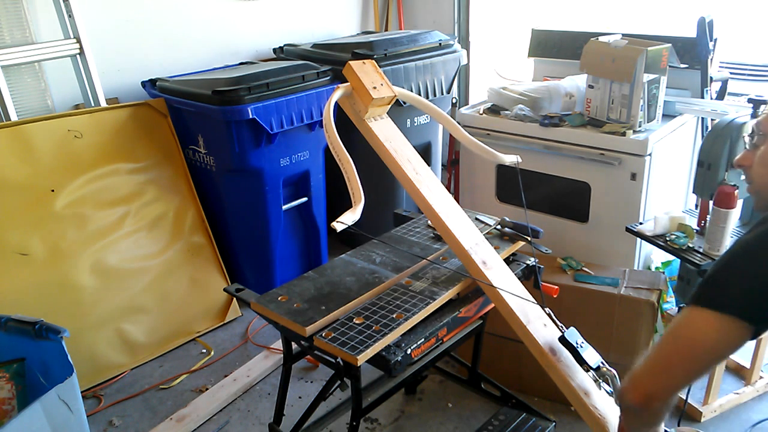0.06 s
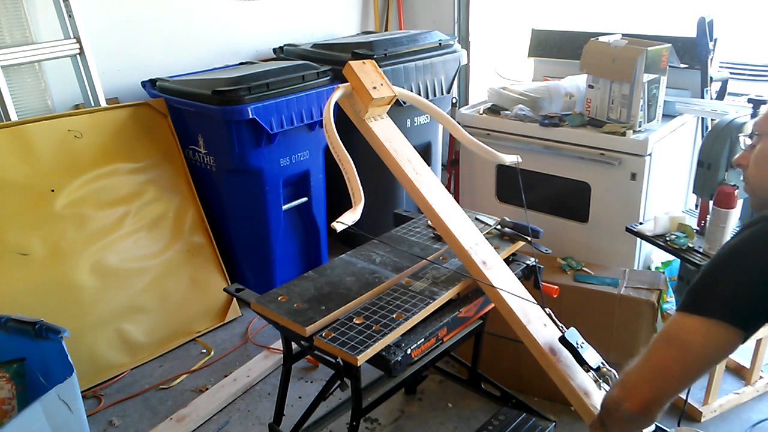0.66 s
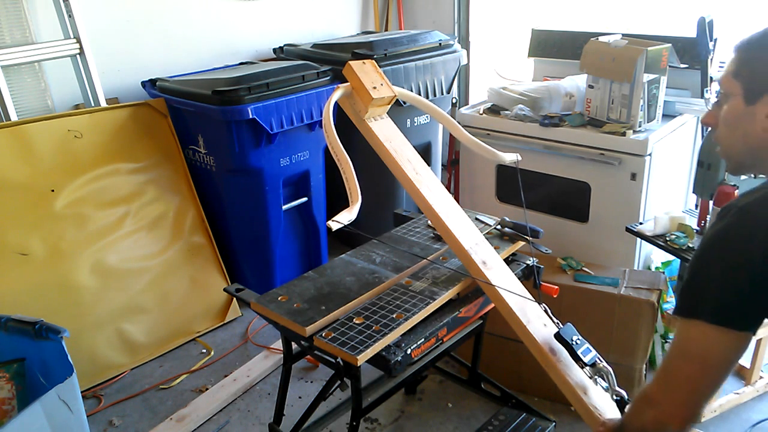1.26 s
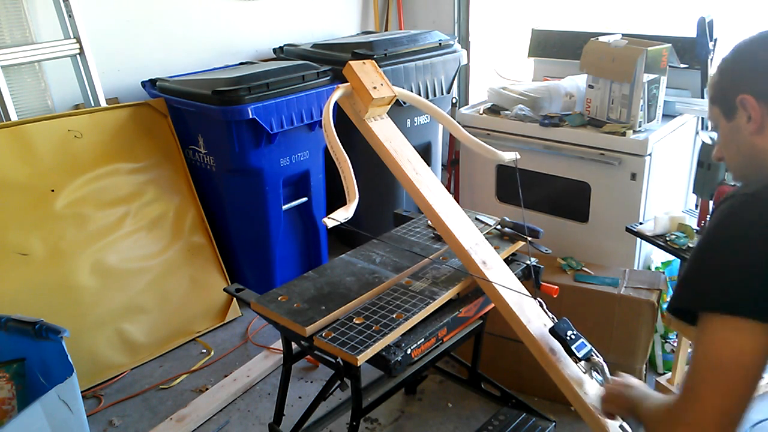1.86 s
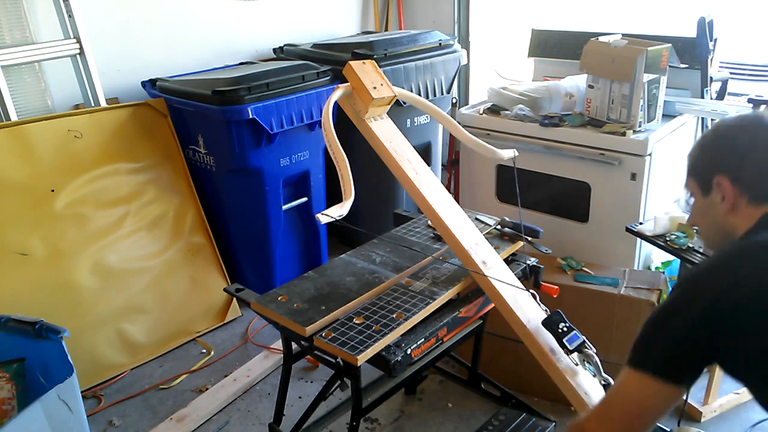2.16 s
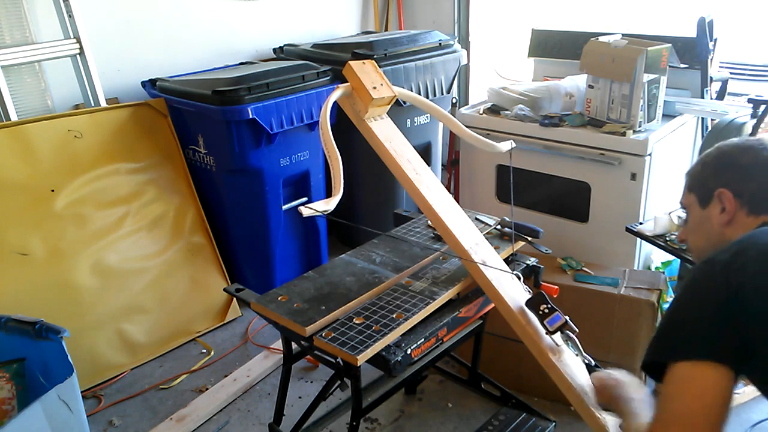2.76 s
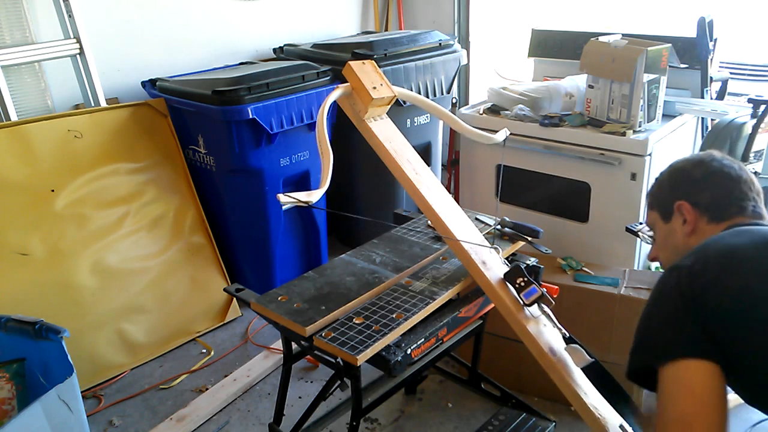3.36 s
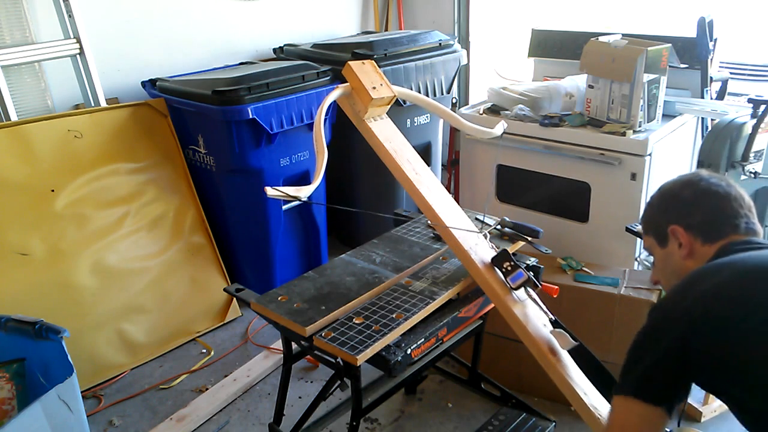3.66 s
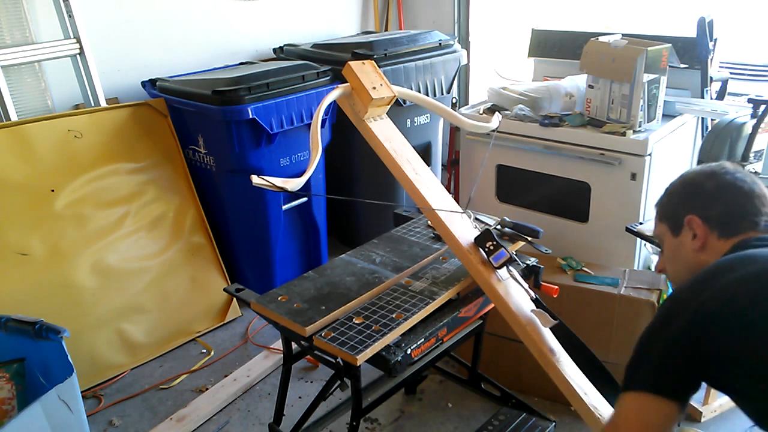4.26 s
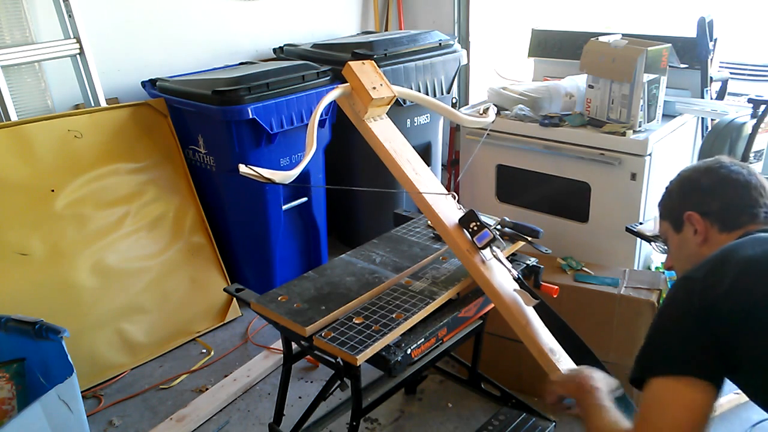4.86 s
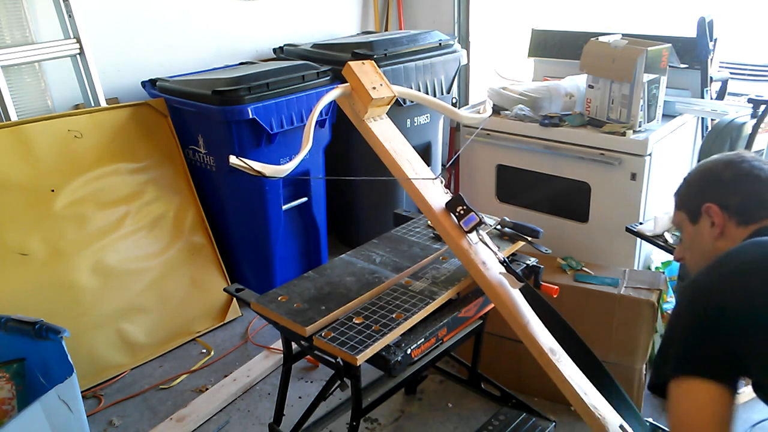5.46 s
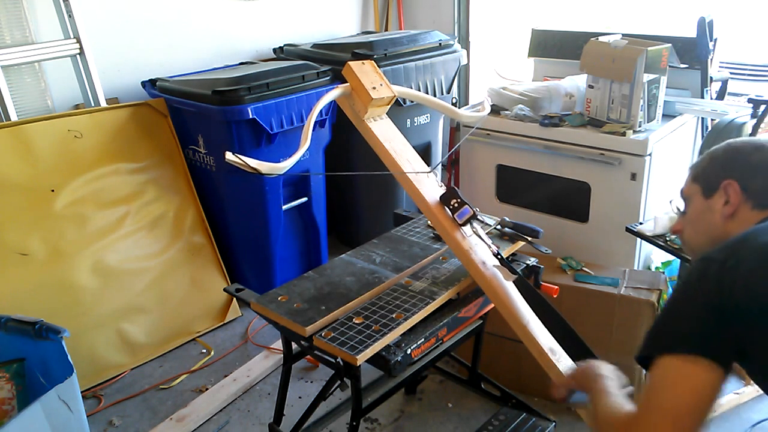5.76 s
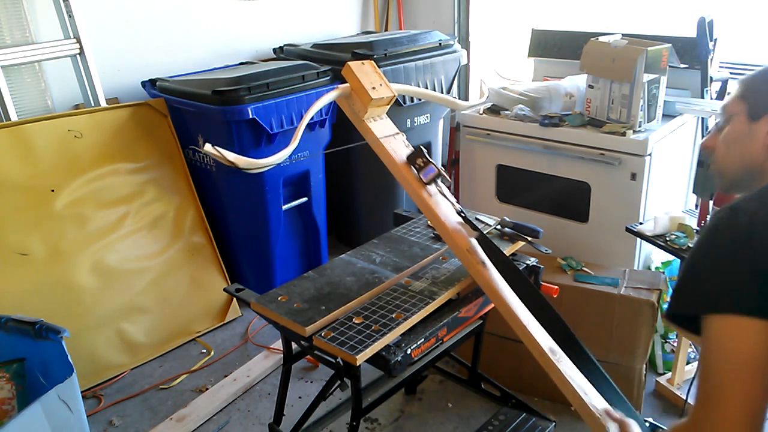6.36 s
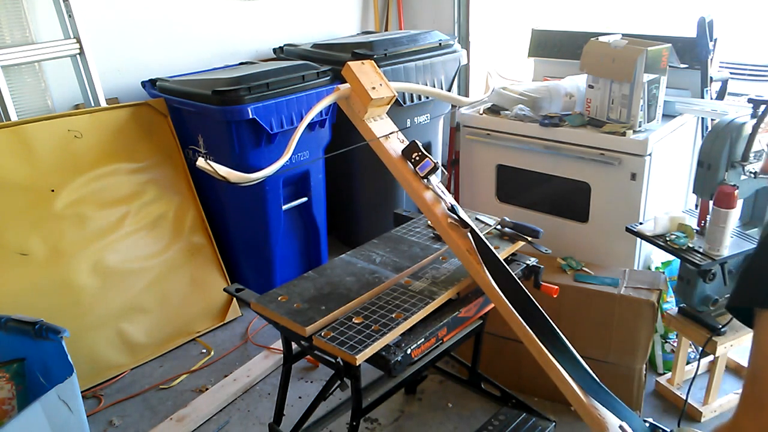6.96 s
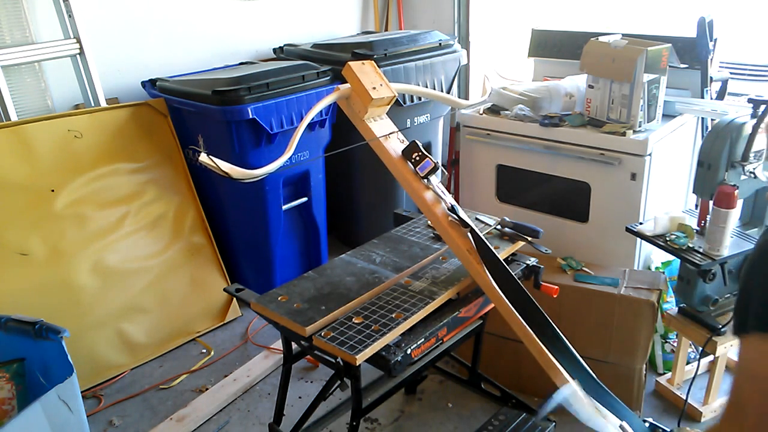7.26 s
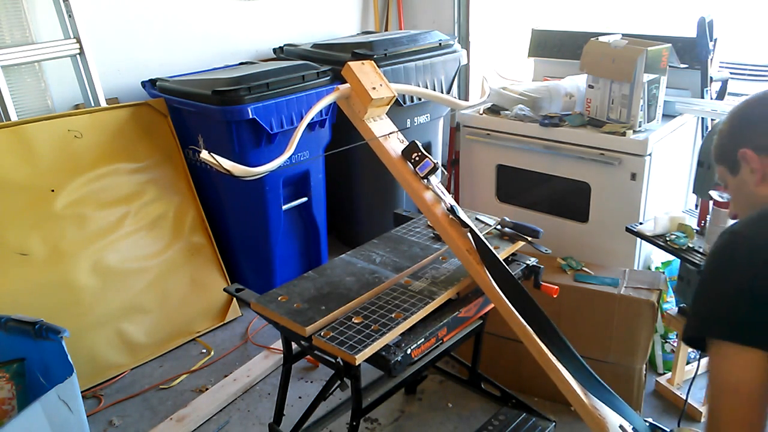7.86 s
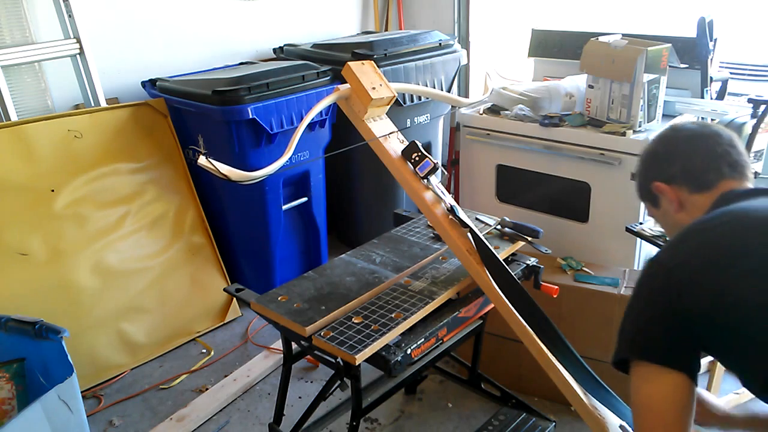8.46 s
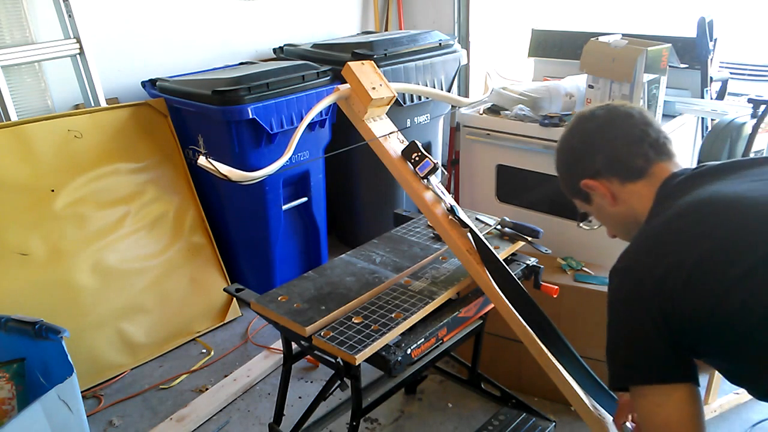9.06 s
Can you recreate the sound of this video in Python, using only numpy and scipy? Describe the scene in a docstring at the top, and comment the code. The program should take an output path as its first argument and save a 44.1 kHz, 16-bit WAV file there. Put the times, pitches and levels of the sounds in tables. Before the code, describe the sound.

In a bare garage, a hand winch on a wooden board lets down a drawn bow. Its ratchet gives a few spaced metal clicks, settles into steady clicking, then spins in a fast, surging run. Each click rings the steel and knocks the wood. The slack tackle clatters briefly at the end. Faint air and a low drone lie underneath, and the mono microphone is slightly overloaded.

```python
"""A garage with bare walls, where a drawn bow is let down with a hand winch on a wooden testing board.
The pawl drops tooth by tooth, first singly, then in a fast run; each drop ticks, rings the steel and
knocks the board. The slack tackle clatters at the end. Faint air and a low drone lie underneath,
the walls answer the winch, and a mono microphone is pushed to its limit."""
import sys
import numpy as np
from scipy import signal
from scipy.fft import rfft, irfft, next_fast_len
from scipy.io import wavfile

SR = 44100
rng = np.random.default_rng(int(sys.argv[2]) if len(sys.argv) > 2 else 0)


def materialize(psi):
    """Save the field psi as 16-bit PCM at rate SR to the path in sys.argv[1].

    A 1-D psi becomes a single channel; in a 2-D psi each row is a channel.
    """
    bounded = np.clip(np.atleast_2d(psi).T, -1, 1)
    quanta = np.round(bounded * 32767).astype(np.int16)
    wavfile.write(sys.argv[1], SR, quanta)


N = 401751
T = np.arange(N) / SR


def amp(db):
    """Decibels to gain."""
    return 10 ** (np.asarray(db) / 20)


def fade(t, t60):
    """Exponential decay, 60 dB down after t60 seconds."""
    return np.exp(-np.log(1000) * t / t60)


def curve(x, points):
    """Read a breakpoint curve at x."""
    return np.interp(x, *np.transpose(points))


def add(out, at, sound):
    """Mix a sound in at a time in seconds."""
    start = max(int(at * SR), 0)
    out[start:start + len(sound)] += sound[:N - start]


def colour(x, points, size=4096):
    """Minimum-phase EQ through (Hz, dB) points that keeps the power of white noise."""
    hz, db = np.transpose(points)
    log_f = np.log(np.fft.rfftfreq(size, 1 / SR) + 1)
    gain = amp(np.interp(log_f, np.log(hz), db))
    cepstrum = irfft(np.log(gain))
    cepstrum[1:size // 2] *= 2
    cepstrum[size // 2 + 1:] = 0
    response = irfft(np.exp(rfft(cepstrum)))
    return signal.oaconvolve(x, response / np.linalg.norm(response))[:N]


def bursts(times, dbs, t60, rise_s=0.0001, size=6000):
    """One short chatter of contact at each time; heavy parts take a moment to get going."""
    out, t = np.zeros(N), np.arange(size) / SR
    attack = 1 - np.exp(-t / rise_s)
    for at, db, decay_s in zip(times, dbs, t60 * np.ones(len(times))):
        add(out, at, amp(db) * attack * fade(t, decay_s) * rng.standard_normal(size))
    return out


def waver(hz, width_hz):
    """A narrow tone whose strength and pitch wander; rms 1."""
    size = next_fast_len(N)
    f = np.fft.rfftfreq(size, 1 / SR)
    resonance = 1 / (1 + (2 * (f - hz) / width_hz) ** 2)
    tone = irfft(rfft(rng.standard_normal(size)) * resonance, size)[:N]
    return tone / tone.std()


# The dark colour of the air. Each row: frequency in Hz, gain in dB.
AIR_EQ = [(15, -47.5), (25, -9.5), (32, -19.5), (43, -14.5), (64, -12.5), (92, -15.5), (145, -17),
          (293, -26), (607, -25.5), (775, -29.5), (1260, -28.5), (2480, -35), (7510, -38), (9840, -48.5),
          (16000, -47)]
# The drone's two tones. Each row: pitch in Hz, width in Hz, relative level in dB.
DRONE_TONES = [(61.3, 6.3, 1), (81.5, 5.5, -6.5)]
# The drone sinks slowly, the air mostly near the end. Each row: time in seconds, air in dB, drone in dB.
ROOM_TONE_FADERS = [(0, -44.5, -42.5), (7.5, -45, -47.5), (9.1, -49, -51.5)]


def room_tone():
    """A bed of faint air noise and a wavering low drone."""
    times, air_db, drone_db = np.transpose(ROOM_TONE_FADERS)
    air = colour(rng.standard_normal(N), AIR_EQ)
    drone = sum(amp(db) * waver(hz, width) for hz, width, db in DRONE_TONES)
    return amp(np.interp(T, times, air_db)) * air + amp(np.interp(T, times, drone_db)) * drone


# The thin colour of the hiss. Each row: frequency in Hz, gain in dB.
HISS_EQ = [(200, -9), (700, -12), (1050, -5), (1400, -11), (2900, -13.5), (3900, 1.5), (5000, -3),
           (6200, 2.5), (8000, -6), (9500, -24), (16000, -35)]


def hiss(db, end_s, fall_s):
    """A brief soft hiss that fades out before the first click."""
    fade_out = np.clip((end_s - T) / fall_s, 0, 1)
    return amp(db) * fade_out * colour(rng.standard_normal(N), HISS_EQ)


# The bright edge of metal contact. Each row: frequency in Hz, gain in dB.
TICK_EQ = [(1500, -30.5), (3000, 4.5), (4400, -3), (5300, -2), (6300, -4.5), (7200, 5.5), (8100, 3.5),
           (9300, -7.5), (11000, -9), (12000, -22), (13300, -17.5), (14500, -23), (16000, -24.5)]


def metal_ticks(times, dbs, t60):
    """Hard metal makes contact in a short, bright tick, on tackle and pawl alike."""
    return colour(bursts(times, dbs, t60), TICK_EQ)


# Loose tackle and crank: three faint taps early, a clatter at the end.
# Each row: start in seconds, knock level in dB, tick level in dB, knock's 60 dB decay in seconds.
TACKLE_HITS = [(0.49, -39, -33, 0.04), (0.516, -36, -36, 0.033), (1.671, -42, -39, 0.037),
               (7.764, -12, -17, 0.077), (7.78, -8, -14, 0.045), (7.802, -9, -8.5, 0.031),
               (7.842, -31, -13, 0.017), (7.966, -16, -21.5, 0.059), (7.98, -17, -40, 0.051),
               (8.042, -15.5, -25, 0.019), (8.075, -20, -36, 0.027), (8.192, -22.5, -29, 0.052)]
# The woody body of those knocks. Each row: frequency in Hz, gain in dB.
TACKLE_EQ = [(60, -26.5), (150, -12), (280, -10), (400, -3), (520, -2.5), (700, 0), (1400, 3.5), (2100, 5),
             (3000, -4.5), (5000, -8), (8000, -26.5), (14000, -34)]


def tackle():
    """Crank, hook and scale knock on the wood when no load holds them."""
    times, knock_db, tick_db, knock_t60 = np.transpose(TACKLE_HITS)
    knocks = colour(bursts(times, knock_db, knock_t60), TACKLE_EQ)
    return knocks + metal_ticks(times, tick_db, t60=0.018)


# Single clicks while the crank is eased round by hand. Each entry: start in seconds.
EASED_DROPS = [0.5651, 0.966, 1.331, 1.7981, 1.9496, 2.0614, 2.159, 2.2565, 2.3495, 2.4186, 2.486, 2.5663,
               2.6585, 2.7589, 2.8446, 2.92, 2.9815, 3.0385, 3.0923, 3.1465, 3.2066, 3.278, 3.3528, 3.4317,
               3.506, 3.5734, 3.6314, 3.6805, 3.7285, 3.7729, 3.8208, 3.9079, 4.0025, 4.0893, 4.17, 4.2427,
               4.3094, 4.3718, 4.433, 4.4956, 4.56, 4.6336, 4.7233, 4.814, 4.8983, 4.9696, 5.0424, 5.119,
               5.2212, 5.3234, 5.4009, 5.488, 5.5881, 5.694, 5.7871, 5.8795, 5.9617]
# Then the crank is spun, in surges. Each row: time in seconds, speed in teeth per second.
SPIN_SPEED = [(6.018, 21.77), (6.077, 31.46), (6.232, 27.96), (6.412, 41.37), (6.5, 30.01), (6.592, 30.65),
              (6.693, 36.9), (6.868, 20.41), (7.03, 32.39), (7.291, 13.55), (7.464, 26.03), (7.54, 25.94),
              (7.67, 13.65)]


def pawl_drops():
    """Times of all drops: the eased ones, then one for each tooth the spinning wheel carries past."""
    spin_times = T[(T >= SPIN_SPEED[0][0]) & (T <= SPIN_SPEED[-1][0])]
    teeth_passed = np.cumsum(curve(spin_times, SPIN_SPEED)) / SR
    teeth = np.arange(round(teeth_passed[-1]) + 1)
    return np.concatenate([EASED_DROPS, np.interp(teeth, teeth_passed, spin_times)])


# The bow's pull on the strap. Each row: time in seconds, draw from 0 (slack) to 1 (full).
BOW_DRAW = [(1.3, 0.93), (2.2, 0.65), (3.3, .58), (4.4, 0.31), (5.6, 0.25), (6.3, 0.097), (7.1, 0.013)]
WHEEL_TEETH, EASY_TEETH_PER_S, LOOSE_TEETH_PER_S = 10, 13, 45.6
FIRM_DRAW = 0.19  # below this draw the wheel runs loose and the swing dies away


def drop_levels(times, dynamics, surge_db=0, scatter_db=1.0):
    """Each drop's level in dB: it swings twice a turn under load, and surges with speed when loose."""
    base_db, speed_db, draw_db, swing_db, peak_tooth = dynamics
    speed = 1 / np.gradient(times)
    draw = curve(times, BOW_DRAW)
    firm = np.clip(draw / FIRM_DRAW, 0, 1)
    turns = (np.arange(len(times)) - peak_tooth) / WHEEL_TEETH
    steady = base_db + speed_db * np.log2(speed / EASY_TEETH_PER_S) + draw_db * draw
    swing = swing_db * np.cos(2 * np.pi * 2 * turns)
    surge = surge_db * np.log2(speed / LOOSE_TEETH_PER_S)
    return steady + firm * swing + (1 - firm) * surge + scatter_db * rng.standard_normal(len(times))


# The crisp top of the snap. Each row: frequency in Hz, gain in dB.
SNAP_EQ = [(2500, -19), (5000, -1), (8000, 5.5), (9500, 0.5), (11000, -2.5), (12200, -21.5), (13300, -13),
           (14500, -2), (16000, -10.5)]


def pawl_snap(times, dbs):
    """The pawl lands on a tooth with a very short crack of treble."""
    return colour(bursts(times, dbs, t60=0.0072), SNAP_EQ)


# The frame's hard midrange. Each row: frequency in Hz, gain in dB.
FRAME_EQ = [(700, -37), (1080, -16.5), (1200, -1), (1450, -6.5), (1750, 3), (2050, -0.5), (2450, -1.5),
            (2700, -6), (3200, -9.5), (3800, -16), (6000, -19)]


def frame_chatter(times, dbs):
    """The heavy frame chatters after each drop, with a softer attack than the pawl."""
    return colour(bursts(times, dbs, t60=0.064, rise_s=0.0022), FRAME_EQ)


# The board's hollow body. Each row: frequency in Hz, gain in dB.
BOARD_EQ = [(60, -31.5), (130, -19), (230, -14), (300, -26), (380, -2.5), (500, -4), (800, 2.5), (1050, 3),
            (1500, -10), (3000, -24)]


def board_knock(times, dbs):
    """Each drop knocks the wooden board under the winch."""
    return colour(bursts(times, dbs, t60=0.074, rise_s=0.00066), BOARD_EQ)


# The tock needs a load to speak. Each row: draw from 0 to 1, trim in dB.
TOCK_BY_DRAW = [(0, -10.5), (.3, -0.5), (.65, 0.5), (1, -4.5)]


def frame_tock(times, dbs, hz, sag, swell_s, width_s, size=2600):
    """The frame answers each drop with a compact tock that swells after the tick and sags in pitch."""
    out, t = np.zeros(N), np.arange(size) / SR
    load_db = curve(curve(times, BOW_DRAW), TOCK_BY_DRAW)
    attack = 1 - fade(t, 0.01)
    for at, db in zip(times, dbs + load_db):
        detune, phase, lag = rng.standard_normal(3)
        peak_s = swell_s * (1 + 0.13 * lag)
        envelope = attack * np.exp(-((t - peak_s) / width_s) ** 2)
        pitch = hz * (1 + 0.035 * detune - sag * (t / swell_s - 1))
        add(out, at, amp(db) * envelope * np.sin(2 * np.pi * (np.cumsum(pitch) / SR + phase)))
    return out


# The load shifts the contact, and with it the ring of string, frame, wheel and pawl. Each row: pitch in
# Hz, 60 dB decay in seconds, then relative level in dB at slack, one third, two thirds and full draw.
WINCH_MODES = [(175.4, 1.0, -39, -34, -34, -30.5), (232.9, 1.9, -48.5, -41, -28, -34),
               (378, 0.15, -29, -20, -21, -31), (1200, 0.085, -7, -5.5, -3.5, -6.5),
               (1230, 0.088, -13, -12, -25, -24), (1453, 0.059, 4.5, -9, -4.5, -25),
               (1554, 0.032, -3, -5.5, -1.5, 6.5), (1653, 0.021, 1, 3.5, -26, -10),
               (1788, 0.077, -16, 5.5, -2.5, 0.5), (1830, 0.13, -22, -14, 1, -16),
               (2002, 0.1, 0, 4.5, 3, -1), (2080, .1, -6, -24.5, -9, -4.5),
               (2270, 0.061, -20, -29, -16.5, 3), (2534, 0.12, -7.5, -5.5, -12, -5),
               (2905, 0.098, -16.5, -24, -17, -36), (2990, 0.13, -7.5, -7, -16.5, -10),
               (3332, 0.037, -4.5, 3, 5.5, -12.5), (4300, 0.022, -25.5, -13, -13, -11.5),
               (4840, 0.032, -4.5, -6, -26, -16), (5040, 0.086, -16.5, -13.5, -19, -20),
               (5710, 0.043, -17.5, -8.5, -5, 3), (7010, 0.04, 2.5, 8, -5.5, -19),
               (7800, 0.022, 13.5, -9.5, -0.5, -9), (7890, 0.038, -2, 2.5, 5, 2),
               (9100, 0.054, -5.5, -4.5, -7.5, -6), (10700, .015, -22, -23, 6, -11.5),
               (11310, 0.018, -17.5, -9.5, 1.5, -7), (12150, .025, -9, -30, -28, -31),
               (13880, .016, 3.5, -20, -27.5, -23), (14700, .015, -11, -16.5, -12, -18)]


def steel_ring(times, frame_db, pawl_db, scatter_db, split_hz):
    """The winch rings in its modes; each tooth strikes them a little differently."""
    modes = np.array(WINCH_MODES)
    hz, t60, db_by_draw = modes[:, 0], modes[:, 1], modes[:, 2:]
    t = np.arange(SR // 2) / SR
    envelopes = fade(t, t60[:, None]) * (1 - t / t[-1])
    partials = np.exp(2j * np.pi * hz[:, None] * t) * envelopes
    draw = curve(times, BOW_DRAW)
    db = np.transpose([np.interp(draw, np.linspace(0, 1, len(row)), row) for row in db_by_draw])
    # low modes belong to the frame, high ones to the pawl and wheel
    db += np.where(hz < split_hz, frame_db[:, None], pawl_db[:, None])
    db += scatter_db * rng.standard_normal(db.shape)
    strikes = amp(db) * np.exp(2j * np.pi * rng.random(db.shape))
    out = np.zeros(N)
    for at, ring in zip(times, (strikes @ partials).imag):
        add(out, at, ring)
    return out


# The odd tooth clinks with a pitch of its own. Each row: start in seconds, pitch in Hz, level in dB.
TOOTH_CLINKS = [(1.331, 5730, -22), (2.419, 5070, -14), (3.148, 4280, -20), (6.057, 5740, -15),
                (6.091, 5230, -9)]


def tooth_clinks(t60, width_hz=160, size=6000):
    """Brief rough clinks from the wheel, each a cluster of close steel tones."""
    out, t = np.zeros(N), np.arange(size) / SR
    for at, hz, db in TOOTH_CLINKS:
        cluster_hz = hz + width_hz * rng.standard_normal((8, 1))
        tones = np.sin(2 * np.pi * (cluster_hz * t + rng.random(cluster_hz.shape)))
        add(out, at, amp(db) * fade(t, t60) * tones.sum(axis=0) / np.sqrt(len(tones)))
    return out


# How hard a drop drives each part. Each lists: relative level at easy speed in dB, dB per doubling of
# speed, dB added at full draw, swing in dB, tooth from which the swing is counted.
PAWL_DYNAMICS = (-1.93, 0.95, 0.5, 0.76, 3.5)
FRAME_DYNAMICS = (-11.5, 1.44, 3, 1.5, 1.3)
BOARD_DYNAMICS = (-22.5, 2, -7.5, -1, 2.5)
TOCK_DYNAMICS = (-11.5, 1.5, -1.5, 5.5, 1.56)
# The pawl snaps hardest under a middling load. Each row: draw from 0 to 1, trim in dB.
PAWL_BY_DRAW = [(0, -3), (.25, -0.3), (.6, 0.27), (.9, -1.5)]


def ratchet(surge_db=4):
    """Each drop sets off all the winch's layers. Returns the sound spread round and that beamed forward."""
    times = pawl_drops()
    pawl_db = drop_levels(times, PAWL_DYNAMICS) + curve(curve(times, BOW_DRAW), PAWL_BY_DRAW)
    # a loose wheel shakes frame and board surge_db more per doubling of speed
    frame_db = drop_levels(times, FRAME_DYNAMICS, surge_db)
    board_db = drop_levels(times, BOARD_DYNAMICS, surge_db)
    tock_db = drop_levels(times, TOCK_DYNAMICS, surge_db)
    snap = pawl_snap(times, pawl_db - 3)
    tick = metal_ticks(times, pawl_db - 3, t60=0.022)
    frame = frame_chatter(times, frame_db + 1.72)
    board = board_knock(times, board_db)
    tock = frame_tock(times, tock_db, hz=1951, sag=0.059, swell_s=0.0152, width_s=0.0081)
    steel = steel_ring(times, frame_db - 10.5, pawl_db - 15.5, scatter_db=1.5, split_hz=4000)
    return tick + frame + board + steel + tooth_clinks(t60=0.16), snap + tock


# Early reflections off floor, stove and wall. Each row: delay in seconds, gain as a factor.
REFLECTIONS = [(.0037, 0.49), (.0068, 0.28), (0.0126, .5), (0.0156, 0.15)]
# The garage's reverb tail. Each row: frequency in Hz, 60 dB decay in seconds, level in dB.
REVERB_BANDS = [(150, .7, 9), (500, 0.59, 8), (1620, 0.46, 2.5), (2900, 0.45, 1), (5410, 0.4, 2),
                (8350, 0.4, 0.5), (10500, 0.3, -0.5), (15000, 0.35, -4)]


def garage(dry, build_s, echo_hz, segments=24):
    """Direct sound, a few dull early reflections and a dense tail whose treble dies first."""
    t = np.arange(3 * SR // 4) / SR
    hz, t60, db = np.transpose(REVERB_BANDS)
    log_f = np.log(np.fft.rfftfreq(len(t), 1 / SR) + 1)
    bands = np.array([np.interp(log_f, np.log(hz), band) for band in np.eye(len(hz))])
    envelopes = fade(t, t60[:, None]) * (1 - np.exp(-(t / build_s) ** 2))
    envelopes *= (amp(db) / np.linalg.norm(envelopes, axis=1))[:, None]
    out = dry.copy()
    dull = signal.sosfilt(signal.butter(1, echo_hz, fs=SR, output="sos"), dry)
    for delay, gain in REFLECTIONS:
        add(out, delay, gain * dull)
    # a fresh tail for each stretch keeps the reverb smooth and free of ringing tones
    for part, when in zip(np.array_split(dry, segments), np.array_split(T, segments)):
        band_noise = irfft(rfft(rng.standard_normal(len(t))) * bands, len(t))
        tail = np.sum(envelopes * band_noise, axis=0)
        add(out, when[0], signal.fftconvolve(part, tail))
    return out


def scene(beam_send=0.1):
    """Winch and tackle in the garage, snap and tock nearly dry; both channels carry the same signal."""
    spread, beamed = ratchet()
    sources = spread + beam_send * beamed + tackle() + hiss(db=-28.5, end_s=0.054, fall_s=0.053)
    mono = garage(sources, build_s=0.01, echo_hz=5300) + beamed + room_tone()
    return np.array([mono, mono])


def record(dry, ceiling=0.72, knee=5, top_hz=15800):
    """The microphone stage flattens the loudest peaks and cuts the top."""
    rounded = dry / (1 + np.abs(dry / ceiling) ** knee) ** (1 / knee)
    return signal.sosfilt(signal.ellip(10, 0.2, 80, top_hz, fs=SR, output="sos"), rounded)


dry = scene()
out = record(dry)
materialize(out)
```